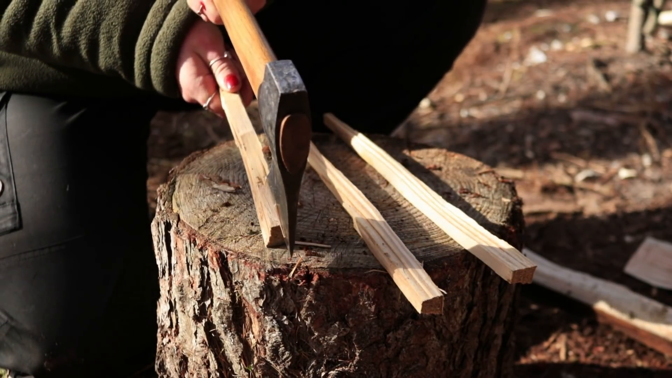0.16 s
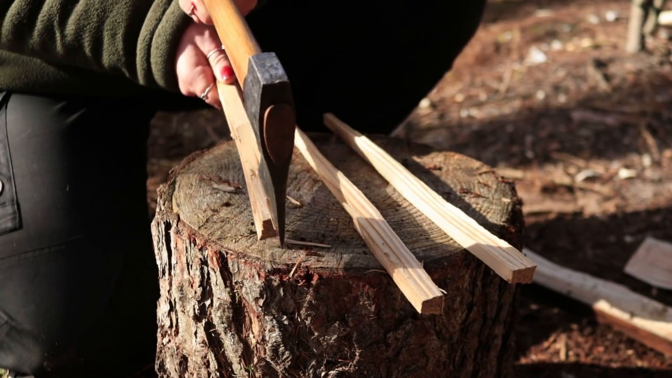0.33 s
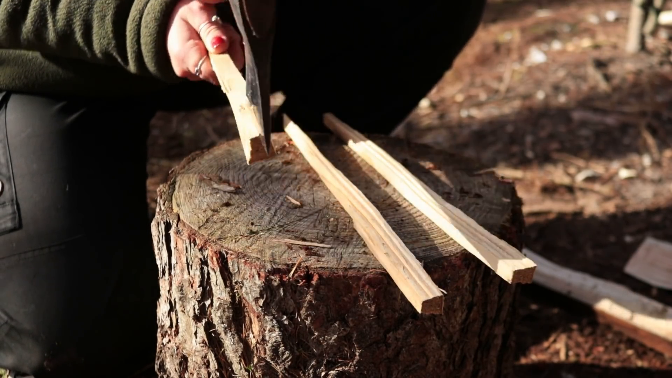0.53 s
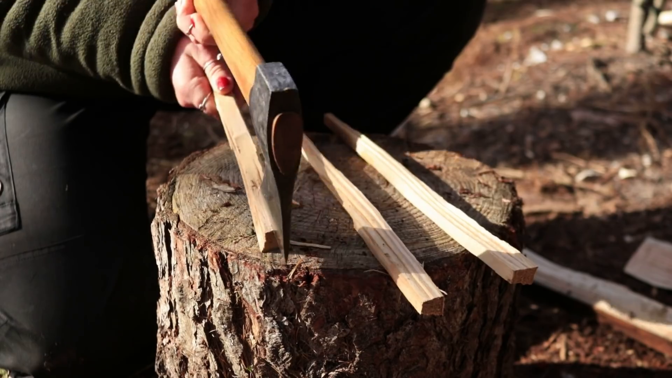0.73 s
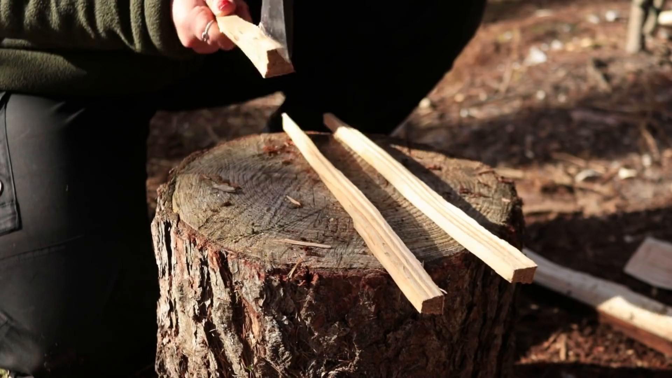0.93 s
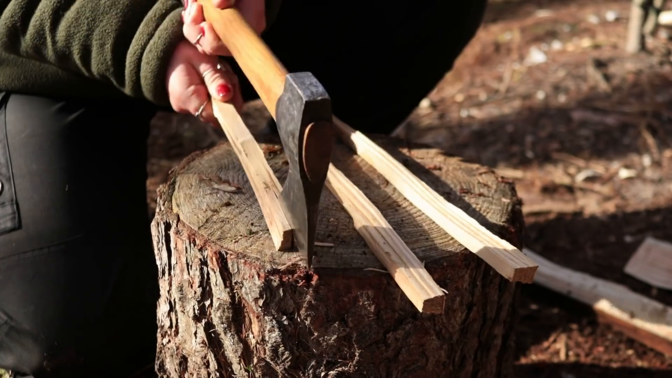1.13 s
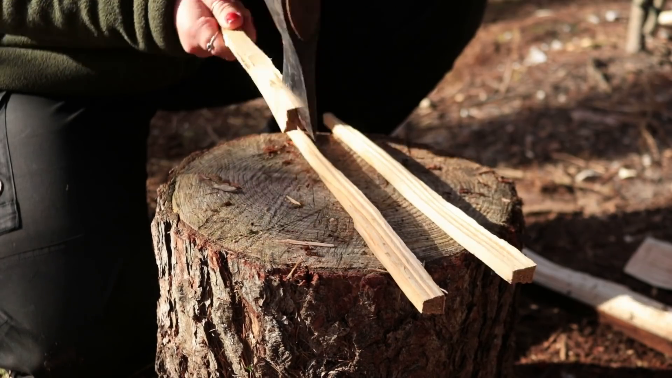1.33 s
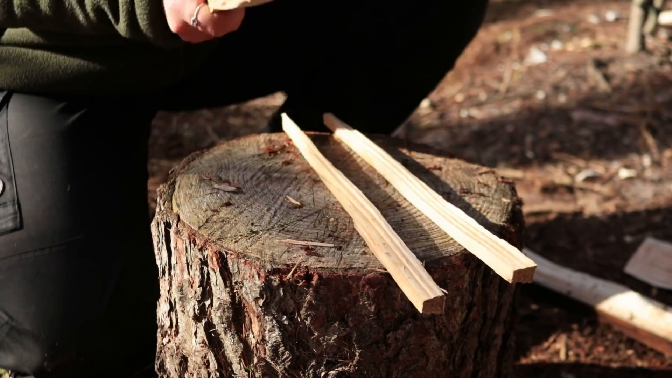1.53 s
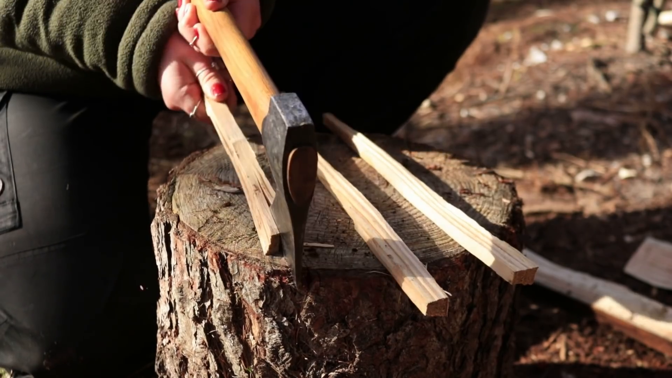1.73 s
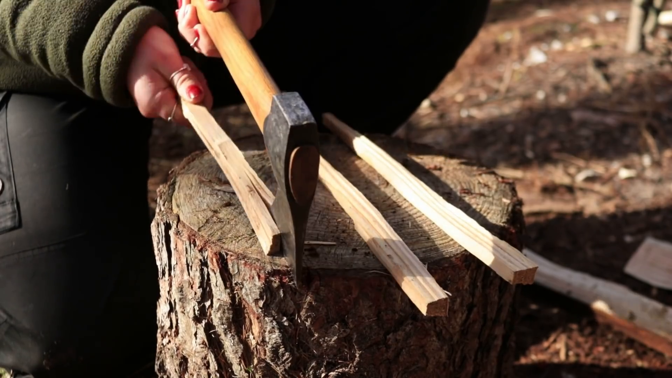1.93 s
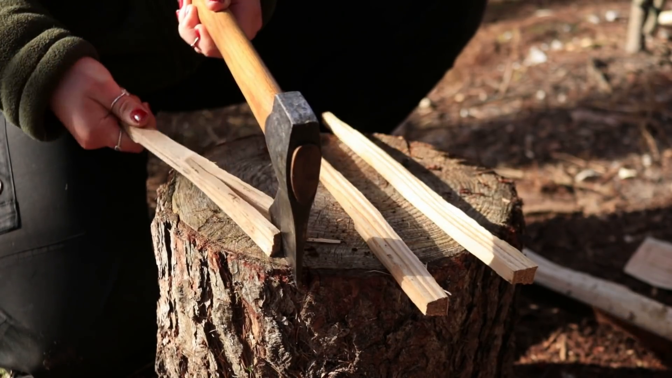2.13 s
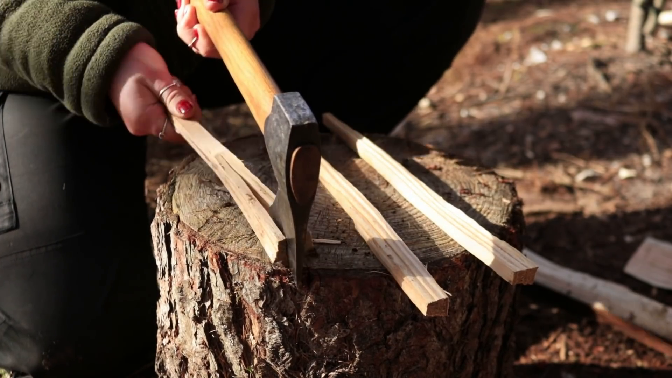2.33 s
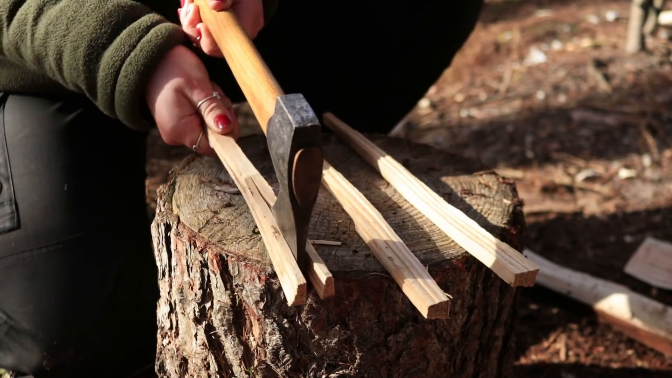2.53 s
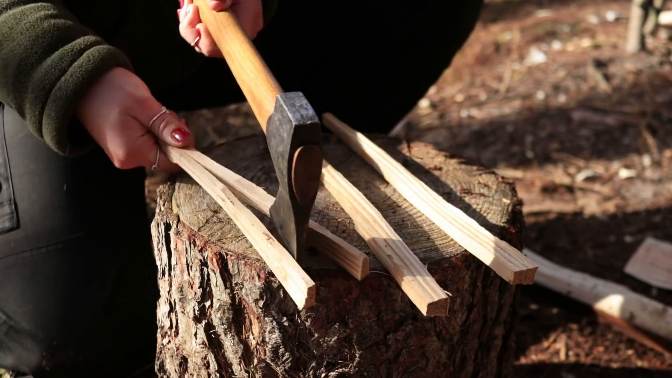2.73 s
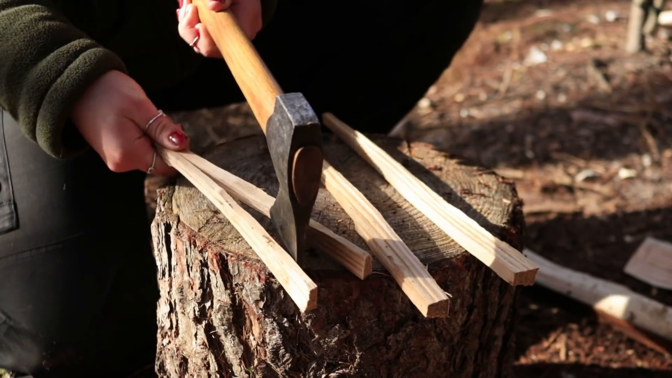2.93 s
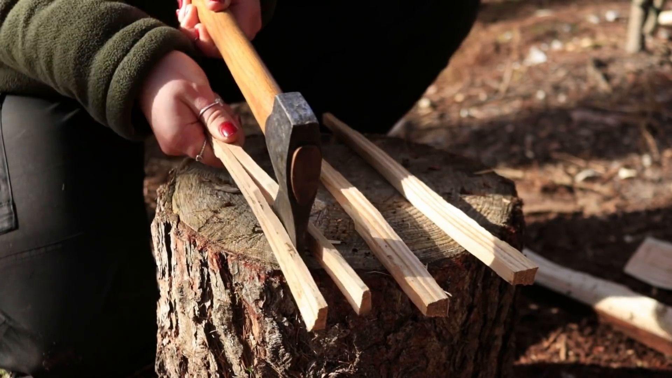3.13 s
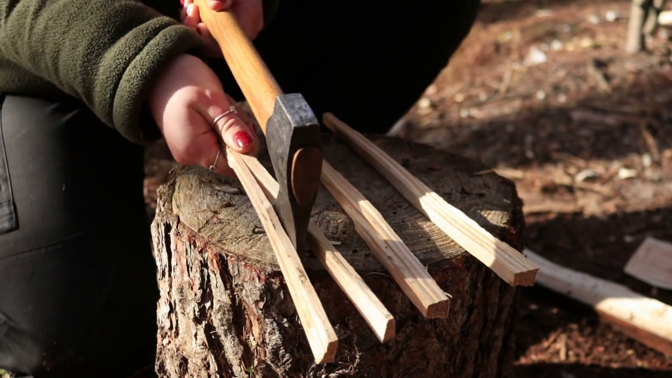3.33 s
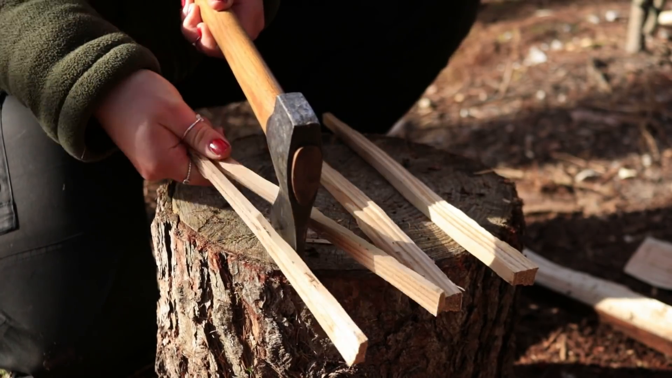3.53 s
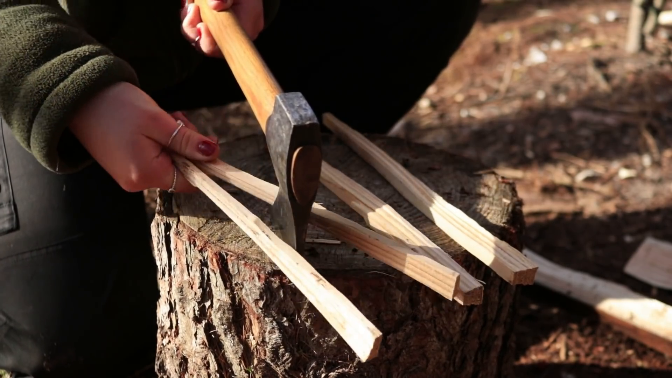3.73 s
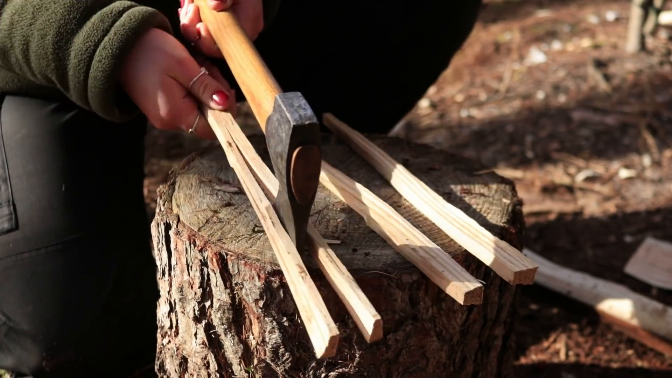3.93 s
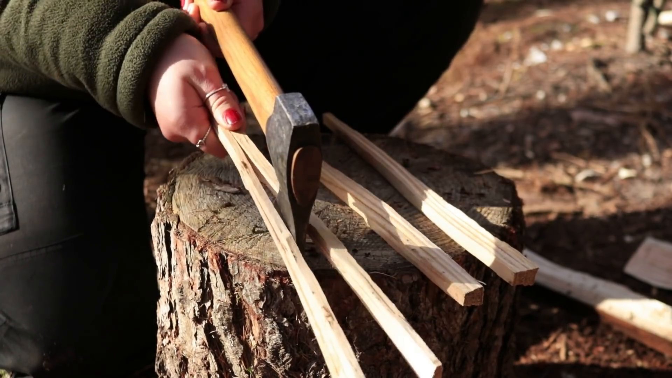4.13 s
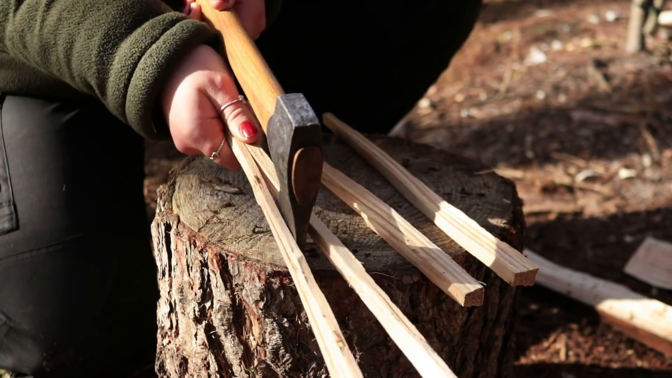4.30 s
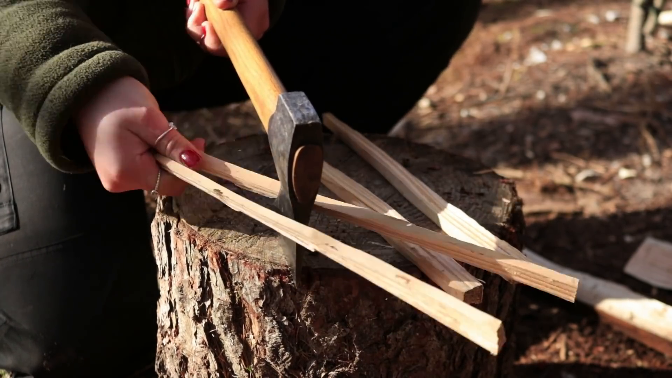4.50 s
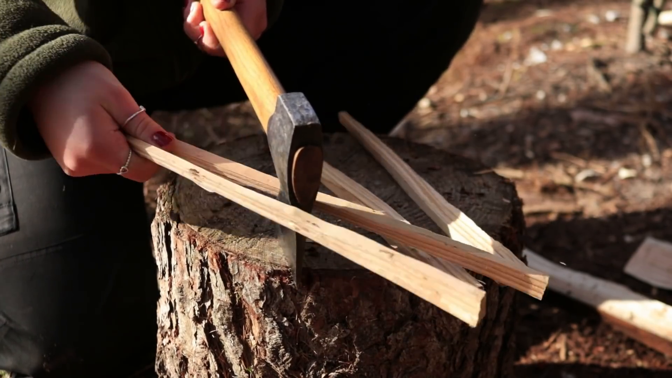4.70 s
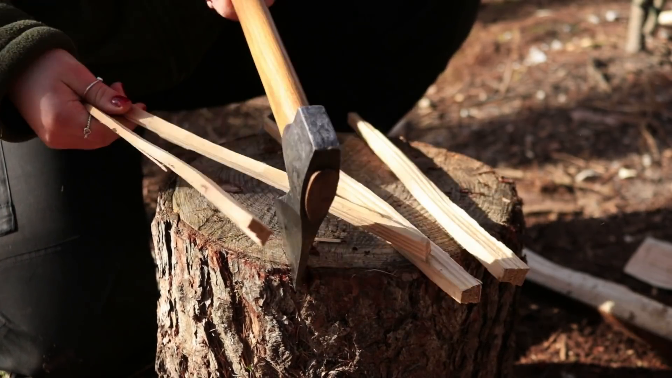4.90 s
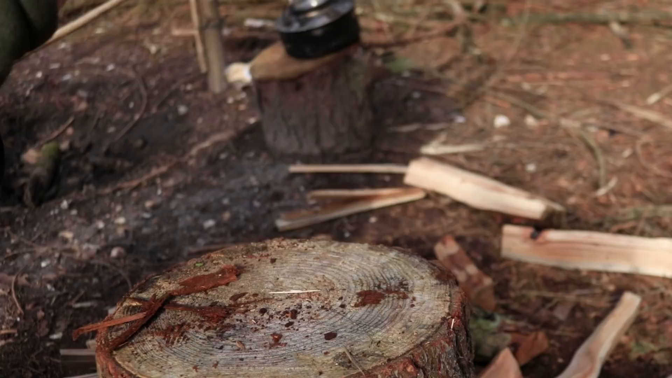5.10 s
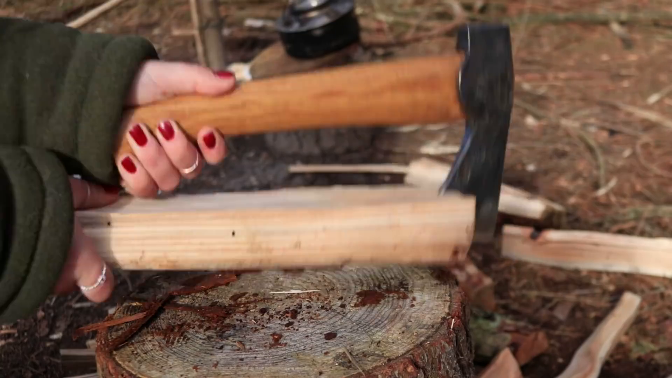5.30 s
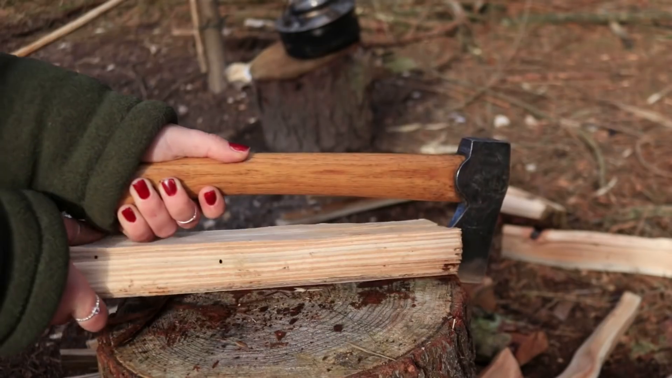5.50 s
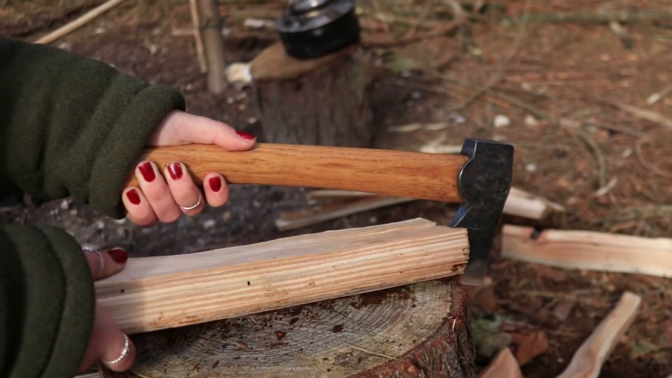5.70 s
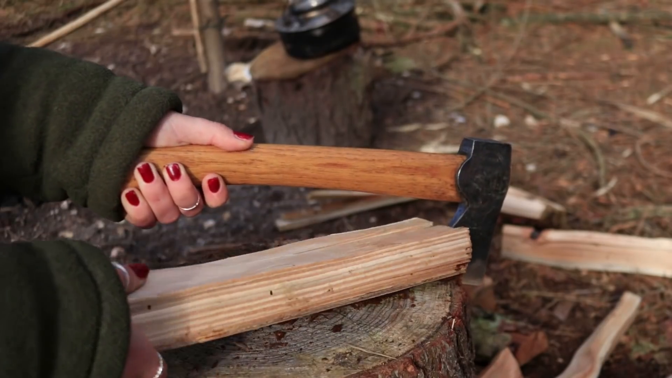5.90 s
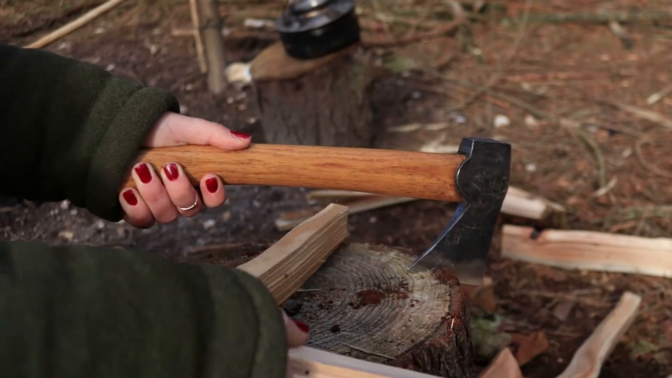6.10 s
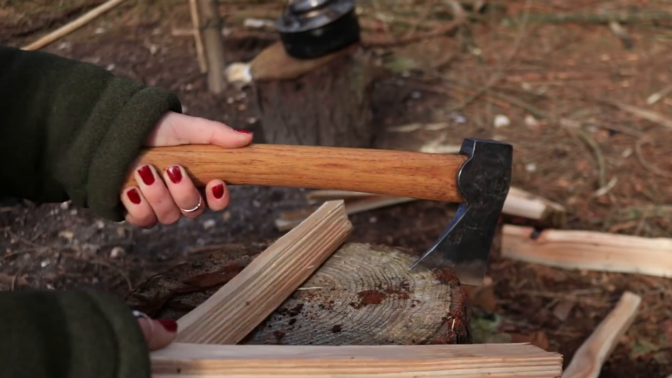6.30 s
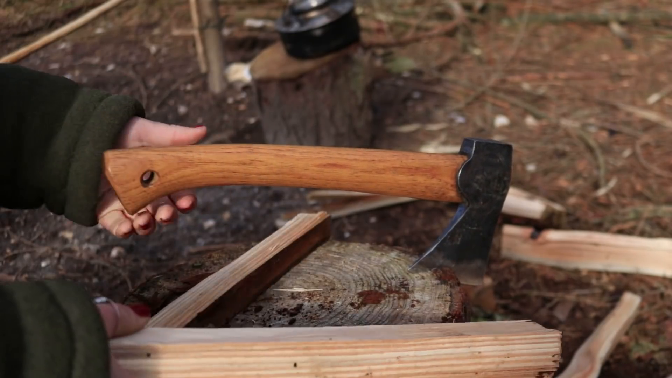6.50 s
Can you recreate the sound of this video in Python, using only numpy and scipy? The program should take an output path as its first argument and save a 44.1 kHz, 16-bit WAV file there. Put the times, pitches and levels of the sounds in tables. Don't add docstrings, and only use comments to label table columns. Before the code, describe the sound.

Close dry hatchet blows on a stump, crackling wood fibres and soft scrapes, a heavy split, sharp cracks and a ringing wooden knock outdoors.

```python
import sys
import numpy as np
from scipy import signal
from scipy.fft import rfft, irfft, next_fast_len
from scipy.io import wavfile

SR = 44100
rng = np.random.default_rng(int(sys.argv[2]) if len(sys.argv) > 2 else 0)


def decibels_to_gain(level_db):
    exponent = np.asarray(level_db, float) / 20
    return 10 ** exponent


def wrap_up_sound(samples):
    columns = np.atleast_2d(samples).T
    tamed = np.clip(columns, -1, 1)
    steps = np.round(tamed * 32767).astype(np.int16)
    wavfile.write(sys.argv[1], SR, steps)


N = 288899

# pitch_hz, density_db (per Hz)
FRICTION_TONE = [(710, -51), (1200, -4), (1680, -10.5), (2380, -24.5), (3110, 11), (3620, -0.5), (4310, -1),
                 (5130, -13), (5900, 4.5), (7660, 6), (14000, -5.5), (16000, -12)]


def splintering():
    # start_s, pitch_hz, peak_db, drive_t60_s
    broad_modes = [(.7195, 3824, -1.5, .012), (.7195, 1491, -5.5, 0.0047), (.7192, 8900, -4, 0.011),
                   (1.175, 7820, 12, 0.021), (1.176, 3880, 9.5, 0.0084), (1.178, 1332, -13, .02),
                   (1.7068, 2900, 4, .016), (1.7085, 1332, 0.5, 0.015), (1.711, 719, -11.5, .02),
                   (2.066, 1280, -34.5, 0.011), (4.554, 4130, -9.5, 0.017), (4.556, 1415, -16.5, 0.028),
                   (4.560, 820, -20, 0.04), (5.4005, 1583, 15.5, 0.0085), (5.404, 867, 7, 0.033),
                   (5.404, 567, 2.5, 0.027), (1.177, 2340, -8, 0.022), (5.9642, 2620, -13, 0.012),
                   (6.0135, 3280, 2, 0.035), (6.017, 1415, -4, 0.028), (6.1325, 1500, -23, 0.017),
                   (6.369, 2860, -36.5, 0.005), (6.467, 990, -18.5, 0.016), (6.467, 2900, -45, .012)]
    # start_s, pitch_hz, peak_db, drive_t60_s
    clear_modes = [(2.065, 3200, -21.5, .0085), (2.063, 4100, -21.5, 0.0081), (5.405, 2340, 1, 0.02),
                   (5.415, 1000, -26, 0.6), (6.017, 2040, -4, 0.04), (6.014, 540, -16, .022),
                   (.723, 810, -27.5, 0.023), (6.017, 930, -13.5, .025), (6.370, 4200, -27.5, 0.011)]
    out = np.zeros((2, N))
    for rows, width_over_pitch in ((broad_modes, 0.32), (clear_modes, 0.11)):
        for s, hz, peak_db, t60 in rows:
            width_hz = width_over_pitch * hz
            drive = burst(t60, rise_s=0.0013, spread=0.15 + hz / 14000, length=11000)
            rung = resonance(resonance(drive, hz, 5.4 * width_hz), hz, width_hz)
            add(out, s - 0.0005, decibels_to_gain(peak_db) * rung / np.abs(rung).max())
    return out


def thuds():
    # start_s, stump_db, ground_db
    blows = [
        (.723, -30.5, -30),
        (1.18, -24.5, -33.5),
        (1.7118, -8.5, -22.5),
        (5.404, -12.5, -12.5),
        (5.80, -70.5, -38),
    ]
    # pitch_hz, level_db, t60_s
    stump_modes = [(300, 8.5, 0.034), (419, -2, 0.043), (463, 7, 0.014)]
    # pitch_hz, level_db, t60_s
    ground_modes = [(56, 4, 0.085), (110, -1, 0.07)]
    out = np.zeros((2, N))
    soft = np.minimum(np.arange(12000) / (0.0022 * SR), 1)
    stump = band(ring(stump_modes, length=12000), 230, 2200)
    ground = soft * ring(ground_modes, length=12000)
    for s, stump_db, ground_db in blows:
        add(out, s, decibels_to_gain(stump_db) * stump)
        add(out[0], s + 0.0030, decibels_to_gain(ground_db + 0.3) * ground)
        add(out[1], s + 0.0022, decibels_to_gain(ground_db) * ground)
    return out


def loose_pieces():
    # pitch_hz, level_db, t60_s
    stick_modes = [(918, -8.5, .16), (990, -9, 0.13), (1740, -4, 0.12), (1970, -8, 0.14), (2770, 1.5, 0.07),
                   (3000, -16, .09)]
    # start_s, level_db
    stick_knocks = [
        (1.7225, -25.5),
    ]
    # pitch_hz, level_db, t60_s
    chip_modes = [(750, -1, .06), (1500, -4, .02), (2580, 0, .07), (3200, -12, .08)]
    # start_s, level_db
    chip_knocks = [
        (6.1322, -30),
        (6.1343, -36),
    ]
    out = np.zeros((2, N))
    for s, db in stick_knocks:
        add(out, s, decibels_to_gain(db) * ring(stick_modes, length=17000))
    for s, db in chip_knocks:
        add(out, s, decibels_to_gain(db) * ring(chip_modes, length=6000))
    return out


def snap_rows():
    # start_s, peak_db, body_db and middle_db (under the top), pan_db (left-right)
    cracks = [(.719, -10.5, -24, -3.5, -5.5), (1.175, 7, -12.5, -10.5, -4), (1.1823, -10, -22, -15, -10.5),
              (1.7079, 9.5, -22, -8.5, -13), (2.0642, -4, -26, -11, -0.5), (4.4777, -18, -30, -10.5, 1),
              (4.5442, 7, -40, -21, -9.5), (4.5524, 6, -32, -18.5, 0), (4.5590, -11, -14, -1, -2),
              (5.401, 14.5, -14, -16.5, 8), (5.964, -9.5, -20.5, -6, -12), (5.9879, -5, -40, -13, 4.5),
              (5.9954, 3, -21, -5.5, -6), (6.0118, -4, -19.5, -12.5, -0.5), (6.0146, 2, -12.5, -19.5, -1),
              (6.0195, -3, -8, 2, 0)]
    # start_s, peak_db, thickness_db
    tears = [(2.0257, -20.5, -5), (2.0794, -29, -1), (2.156, -12.5, 0), (2.173, -15, -10),
             (2.1834, -20, -7), (2.2401, -17, -15.5), (2.2448, -19, -9.5), (2.6811, -27, -2),
             (2.7128, -26, -0.5), (2.743, -16.5, -2.5), (2.7526, -13, 0), (2.7577, -10, 5.5),
             (2.7929, -4, 0), (2.7971, -11.5, 1), (2.8422, -13.5, 2), (2.8787, -21, -6), (2.925, -19, -10),
             (2.933, -18.5, 11.5), (3.5125, -10.5, -1), (3.579, -25, -4), (3.5966, -14.5, 3.5),
             (3.6015, -14, -4), (3.6384, -14.5, -10), (3.6515, -15, 2.5), (3.676, -16.5, -3.5),
             (3.7044, -22, -1), (3.719, -25.5, -1), (3.7955, -23, -9), (3.8098, -17, 4), (3.8151, -20, -2)]
    # start_s, peak_db, body_db and middle_db (under the top)
    taps = [(0.5327, -33, -1, -38), (0.674, -32, -10, -16.5), (4.507, -32, -8, -3.5),
            (5.019, -33, -7.5, -24), (5.1048, -30, -4, -36), (5.7994, -30, -11, -23.5),
            (5.9318, -26, -18.5, -16), (5.075, -38.5, -23, -24), (5.95, -26, -17.5, -7),
            (6.061, -21.5, -1, -17), (6.0673, -21, -26, -5), (6.0897, -31, -7, -2),
            (6.2772, -29.5, -7, -48), (6.3681, -19, -33, 3.5), (6.4003, -27.5, 5, -5),
            (6.4045, -29, -7, -1), (6.283, -37, -16, -25), (6.4638, -25.5, 7, -1), (6.507, -34.5, -5, -11),
            (5.978, -23, -23, 0), (3.881, -38, -25, -3), (3.933, -33, -25, -18)]
    rows = [(*row, 0.01) for row in cracks]
    for s, peak_db, thick_db in tears:
        rows.append((s, peak_db, -27.5 + 0.68 * thick_db, -18 + thick_db, -0.5, 0.007))
    return rows + [(*row, -8.5, 0.013) for row in taps]


def snaps():
    out = np.zeros((2, N))
    for s, peak_db, body_db, middle_db, pan_db, t60 in snap_rows():
        x = burst(t60, rise_s=0.0004, spread=0.65, length=3500)
        top = band(x, 5400, 11800)
        middle = decibels_to_gain(middle_db + 8.5) * band(x, 2000, 6950)
        body = decibels_to_gain(body_db + 14.5) * band(x, 880, 2220)
        snap = top + middle + body
        sides = decibels_to_gain(np.clip(pan_db, -8, 8) * np.array([[0.4], [-0.4]]))
        add(out, s - 0.0003, decibels_to_gain(peak_db - 0.5) * sides * snap / np.abs(snap).max())
    return out


def rings():
    # start_s, pitch_hz, level_db, t60_s
    struck_modes = [(4.5605, 800, -20, .06), (5.404, 460, -11, .035), (5.964, 1300, -24, .012),
                    (.7185, 1520, -16, .02), (.7195, 2100, -18, .015), (.723, 888, -29, .045),
                    (.722, 2850, -30, .04), (.722, 1800, -39, .06), (1.1755, 2500, -14, .025),
                    (1.1755, 4120, -14, .025), (1.176, 1500, -12, .02), (1.709, 1010, -12, .035),
                    (1.709, 1430, -7, .03), (1.708, 3800, -7, .025), (1.7075, 7400, -7, .015),
                    (5.403, 1090, -6, .04), (5.403, 400, -12, .03), (6.0135, 851, -12, .03),
                    (6.0255, 851, -22, .02), (2.0655, 1050, -30, .015), (6.133, 760, -27, .05),
                    (6.0135, 500, -15, .03), (6.06, 1000, -34, .03), (6.37, 2400, -34, .015),
                    (2.757, 1900, -30, .012), (2.793, 2100, -32, .012), (6.015, 2560, -12, .04),
                    (6.018, 1440, -12, .035), (5.9955, 2300, -14, .015)]
    out = np.zeros((2, N))
    sides = decibels_to_gain(np.array([[-0.8], [0.8]]))
    onset = np.minimum(np.arange(6000) / 22, 1)
    for s, hz, db, t60 in struck_modes:
        add(out, s, sides * onset * ring([(hz, db, t60)], length=6000))
    return out


def shudder():
    start_s, release_s, level_db, t60_s, release_db_per_s = 5.412, 5.59, -37, 0.9, 200
    out, t = np.zeros((2, N)), np.arange(SR // 2) / SR
    mid, side = rng.standard_normal((2, len(t)))
    rattle = band(mid + 0.35 * side * [[1], [-1]], 1450, 2300)
    rattle = band(band(rattle, 900, 2600), 900, 2600)
    released_db = release_db_per_s * np.maximum(t + start_s - release_s, 0)
    dying = decibels_to_gain(level_db - 60 * t / t60_s - released_db)
    add(out, start_s, dying * np.minimum(t / 0.016, 1) * rms_one(rattle))
    return out


def billet():
    # start_s, peak_db, free_share (of the ring time left by the hand)
    knocks = [
        (6.379, -33, 0.3),
        (6.403, -30.5, 0.3),
        (6.469, -11, 0.3),
        (6.506, -29.5, 0.3),
    ]
    # pitch_hz, level_db, t60_s
    bar_modes = [(704, 2, 0.44), (1066, -13, 0.13), (1130, -11, 0.23), (1748, -11, 0.17),
                 (2500, -11, 0.067), (2920, -10, 0.033), (4100, -27, 0.082)]
    out = np.zeros(N)
    for s, peak_db, free in knocks:
        free = 1 if s > 6.45 else np.clip(free, 0.05, 1)
        modes = [(hz, db + rng.normal(0, 1), t60 * free ** (700 / hz)) for hz, db, t60 in bar_modes]
        add(out, s - 0.002, decibels_to_gain(peak_db - 5.5) * ring(modes, length=20000))
    return out


def strokes():
    # start_s, break_s, break_db, rise_db
    swell_rows = [(2.032, 2.067, -36.5, 7), (1.17, 1.1745, -29.5, 14), (2.085, 2.181, -34.5, 7.5),
                  (2.69, 2.752, -37, 14), (2.742, 2.792, -30.5, 10.5), (3.484, 3.521, -41, 14.5),
                  (3.565, 3.592, -33.5, 13), (4.461, 4.481, -42.5, 13.5), (4.478, 4.544, -34, 14),
                  (2.784, 2.799, -25, 6), (4.546, 4.553, -24, 2), (5.235, 5.344, -52, 9.5),
                  (5.912, 5.963, -42, 9.5), (5.971, 6.0, -29, 3.5), (5.998, 6.013, -12, 14.5),
                  (0.715, 0.717, -35, 11.5), (6.054, 6.069, -35, 9.5), (6.075, 6.09, -42.5, 7.5)]
    # start_s, level_db, fall_db_per_s, brightness_db
    spray_rows = [(1.715, -41, 230, -3), (.725, -39, 396, -1.5), (1.1898, -35, 140, -1),
                  (1.18, -20, 1300, 2), (2.066, -35.5, 149.5, 0), (2.18, -37, 157.5, 3),
                  (2.799, -32, 130, 4), (2.838, -36, 220, 5), (3.515, -32.5, 281, 8), (3.593, -36, 97.5, 6),
                  (3.638, -31, 243, 3), (4.56, -34.5, 250.5, -1.5), (5.3, -45, 162, -7),
                  (5.41, -27.5, 399, -3), (5.44, -45.5, 99.5, -9.5), (6.021, -29.5, 297.5, -8)]
    # start_s, end_s, level_db, brightness_db
    rub_rows = [(2.4, 2.618, -47.5, 0), (3.095, 3.386, -51.5, 3), (3.857, 4.016, -47, 2),
                (4.104, 4.384, -50.5, -3), (4.6, 5.258, -59, -1), (5.604, 5.906, -53.5, -1.5),
                (6.296, 6.6, -61, -5.5), (2.22, 2.345, -50, 4.5), (2.923, 3.028, -47.5, -0.5),
                (3.698, 3.878, -49, 1), (6.104, 6.21, -49, -4)]
    tearing_shares = (.45, .28, .2)
    let_go_db_per_s, rub_edge_db_per_s = 3002, 426
    t = np.arange(0, N + 32, 32) / SR
    swells, sprays, rubs = [], [], []
    for start, end, db, rise_db in swell_rows:
        strain = db + rise_db * (t - end) / (end - start)
        let_go = db + let_go_db_per_s * (end - t)
        set_in = db - rise_db + let_go_db_per_s * (t - start + 0.0049)
        swells.append(np.minimum.reduce([strain, let_go, set_in]))
    for s, db, fall_db, _ in spray_rows:
        sprays.append(np.minimum(db - fall_db * (t - s), db + let_go_db_per_s * (t - s)))
    for start, end, db, _ in rub_rows:
        edge = rub_edge_db_per_s * np.minimum(t - start, end - t)
        rubs.append(np.minimum(db, db - 19.5 + edge))
    power = decibels_to_gain(np.maximum(swells + sprays + rubs, -100)) ** 2
    total = power.sum(0)
    bright_db = np.array([6] * len(swells) + [row[3] for row in spray_rows + rub_rows])
    tearing = np.repeat(tearing_shares, [len(swells), len(sprays), len(rubs)])
    tearing = tearing + 0.045 * bright_db
    return in_time(np.transpose([t, 10 * np.log10(total), tearing @ power / total, bright_db @ power / total]))


def fibres():
    sizes = decibels_to_gain(3.0 * np.minimum(rng.exponential(1, N), 4)) * rng.choice([-1, 1], N)
    breaks = rng.random(N) < 1500 * decibels_to_gain(6 * drift(35)) / SR
    clicks = sizes * breaks + 1e-18
    pitches, dealt = np.geomspace(2600, 13500, 12), rng.integers(0, 12, N)
    sides = decibels_to_gain(rng.normal(0, 3, (12, 2, 1)))
    out = 0
    for k, (hz, side) in enumerate(zip(pitches, sides)):
        gain = decibels_to_gain(0.29 * at_hz(FRICTION_TONE, hz))
        out = out + side * gain * resonance(clicks * (dealt == k), hz, 0.13 * hz)
    return rms_one(out)


def slide():
    hiss_db, tearing, bright_db = strokes()
    tearing = np.clip(tearing, 0, 1)
    sizes = decibels_to_gain(2.3 * np.minimum(rng.exponential(1, (2, N)), 5)) * rng.choice([-1, 1], (2, N))
    clicks = rms_one(sizes * (rng.random((2, N)) < 1800 * decibels_to_gain(5 * drift(40)) / SR))
    noise = rng.standard_normal((2, 2, N))
    rubbing = np.sqrt(1 - tearing) * noise
    parting = 0.64 * np.sqrt(tearing) * clicks[:, None] * [[1], [0.6]]
    hiss = coloured(rubbing + parting, FRICTION_TONE, patchy_db=2.8, rate=18)
    hiss = hiss + tearing * fibres()
    top = signal.sosfilt(signal.butter(2, 9000, "high", fs=SR, output="sos"), hiss)
    return decibels_to_gain(hiss_db + 1.8 * drift(61)) * (hiss + (decibels_to_gain(bright_db) - 1) * top)


def ticks():
    # start_s, peak_db, pitch_hz
    tick_rows = [(2.1094, -25, 8050), (2.1274, -23, 7180), (2.1364, -21, 7060), (2.1454, -18, 7220),
                 (2.1614, -16, 6750), (2.2004, -27, 6600), (2.2324, -18, 6600), (2.2524, -28, 6510),
                 (2.2794, -29, 5820), (2.7122, -25, 8340), (2.7244, -17, 7750), (2.7644, -18, 6510),
                 (2.7876, -8, 6560), (2.8194, -22, 7310), (2.8294, -13, 11800), (2.8524, -21, 11700),
                 (2.8724, -20, 10000), (2.9944, -38, 7950), (3.5274, -21, 9040), (3.5394, -25, 12200),
                 (3.5854, -19, 10500), (3.5912, -16, 7410), (3.6114, -21, 13100), (3.6444, -18, 7910),
                 (3.6594, -20, 6220), (3.6864, -25, 7140), (3.7394, -37, 7910), (3.7784, -26, 9180)]
    out = np.zeros((2, N))
    for s, peak_db, hz in tick_rows:
        x = resonance(burst(t60=0.005, rise_s=0.0002, spread=0.7, length=900), hz, 0.8 * hz)
        add(out, s, decibels_to_gain(peak_db - 5) * x / np.abs(x).max())
    return out


def squeals():
    # start_s, end_s, pitch_hz, level_db, width_hz
    squeal_rows = [(2.116, 2.319, 6640, -47.5, 700), (2.403, 2.54, 5650, -59, 300),
                   (3.139, 3.304, 3300, -54.5, 1300), (3.89, 4.019, 4300, -60, 250),
                   (6.04, 6.2, 3100, -52.5, 1180), (6.33, 6.43, 2600, -52, 900),
                   (3.896, 3.97, 3300, -56, 450), (4.715, 4.816, 2900, -55.5, 200),
                   (4.82, 4.956, 2700, -64, 150), (5.696, 5.987, 4400, -68, 260),
                   (3.64, 3.8, 11600, -52, 600), (2.72, 2.9, 11000, -43, 2500),
                   (2.09, 2.17, 11000, -46, 1500), (3.57, 3.68, 7800, -43, 1800)]
    out = np.zeros((2, N))
    for start, end, hz, db, width_hz in squeal_rows:
        length = round((end - start) * SR)
        noise = rng.standard_normal((2, length))
        narrow = resonance(resonance(noise, hz, width_hz), hz, width_hz)
        squeal = rms_one(narrow + narrow[::-1] * 0.5)
        add(out, start, decibels_to_gain(db) * squeal * signal.windows.tukey(length, 0.8))
    return out


def glide():
    # start_s, end_s, from_hz, to_hz, level_db, width_hz
    falling_tone = (2.07, 2.21, 9000, 6700, -44, 900)
    start, end, from_hz, to_hz, db, width_hz = falling_tone
    out, length = np.zeros((2, N)), round((end - start) * SR)
    lowpass = signal.butter(2, width_hz / 2, fs=SR, output="sos")
    slow = signal.sosfilt(lowpass, rng.standard_normal((2, 2, 9000)))[..., :length]
    phase = 2 * np.pi * np.cumsum(np.geomspace(from_hz, to_hz, length)) / SR
    tone = rms_one(slow[0] * np.cos(phase) + slow[1] * np.sin(phase))
    add(out, start, decibels_to_gain(db) * tone * signal.windows.tukey(length, 0.6))
    return out


def trunks(x):
    t60_s, level_db = 0.6, -56.5
    t = np.arange(SR // 2) / SR
    scatter = rng.standard_normal((2, len(t))) * decibels_to_gain(-60 * t / t60_s) * np.minimum(t / 0.01, 1)
    return decibels_to_gain(level_db) * signal.fftconvolve(band(scatter, 750, 2300), x[None])[:, :N]


def background():
    # time_s, level_db
    traffic_level = [(0.0, -46), (0.2, -50.5), (0.51, -49.5), (0.97, -54.5), (1.09, -50), (3.15, -48),
                     (3.32, -43.5), (3.5, -48.5), (4.71, -43.5), (5.09, -50), (6.11, -52), (6.55, -52.5)]
    # pitch_hz, density_db (per Hz)
    rumble_tone = [(20, -11), (45, 3), (70, 5), (110, 2.5), (170, -59.5), (400, -60.5)]
    # pitch_hz, density_db (per Hz)
    air_tone = [(59, -49), (100, -1), (255, -6), (381, -4), (558, -8.5), (1280, -11), (2080, -20),
                (3940, -26), (4670, -31.5), (9610, -26.5), (15000, -36), (16000, -38)]
    rumble_db, = in_time(traffic_level)
    noise = rng.standard_normal((2, 2, N))
    rumble = decibels_to_gain(rumble_db + 1.5) * coloured(noise, rumble_tone, patchy_db=1.5, rate=7.3)
    air = decibels_to_gain(-44.5) * coloured(noise[::-1], air_tone, patchy_db=2.0, rate=4.4)
    return rumble + air


def rms_one(x):
    return x / np.sqrt(np.mean(x ** 2) + 1e-20)


def in_time(rows):
    s, *columns = np.transpose(rows)
    return [np.interp(np.arange(N) / SR, s, c) for c in columns]


def at_hz(points, hz):
    return np.interp(np.log(hz), np.log(np.array(points)[:, 0]), np.array(points)[:, 1])


def band(x, low_hz, high_hz):
    return signal.sosfilt(signal.butter(2, [low_hz, min(high_hz, 0.45 * SR)], "band", fs=SR, output="sos"), x)


def resonance(x, hz, width_hz):
    r = np.exp(-np.pi * width_hz / SR)
    zeros = (1 - r * r) / 2 * np.array([1, 0, -1])
    return signal.lfilter(zeros, [1, -2 * r * np.cos(2 * np.pi * hz / SR), r * r], x)


def drift(rate):
    r = np.exp(-80 * np.pi * rate / SR)
    slow = signal.lfilter([1], [1, -2 * r, r * r], rng.standard_normal(N // 40 + 2002))[2000:]
    return np.interp(np.arange(N) / 40, np.arange(len(slow)), rms_one(slow - slow.mean()))


def ring(modes, length):
    t = np.arange(length) / SR
    return sum(decibels_to_gain(db - 60 * t / t60) * np.sin(2 * np.pi * hz * t) for hz, db, t60 in modes)


def burst(t60, rise_s, spread, length):
    t = np.arange(length) / SR
    mid, side = rng.standard_normal((2, length))
    dying = decibels_to_gain(-60 * t / max(t60, 0.003)) + decibels_to_gain(-42 - 60 * t / 0.12)
    return (mid + spread * side * [[1], [-1]]) * dying * np.minimum(t / rise_s, 1)


def coloured(pair, spectrum, patchy_db, rate):
    # pitch_hz, likeness (-1 to 1)
    port_likeness = [(60, 0.93), (180, 0.9), (550, 0.66), (1650, -0.25), (4970, 0.3), (15000, -0.37)]
    out, edges = 0, 22 * 2 ** np.arange(0, 9.7, 0.4)
    for k, (low, high) in enumerate(zip(edges, edges[1:])):
        hz = np.sqrt(low * high)
        if not spectrum[0][0] < hz < spectrum[-1][0]:
            continue
        mid, side = band(pair[k % 2], low, high)
        alike = np.clip(at_hz(port_likeness, hz), 0, 1)
        gain = decibels_to_gain(at_hz(spectrum, hz) + patchy_db * drift(rate))
        out = out + gain * (np.sqrt(1 + alike) * mid + np.sqrt(1 - alike) * side * [[1], [-1]])
    return rms_one(out)


def add(out, s, x):
    i = round(s * SR)
    out[..., i:i + x.shape[-1]] += x[..., :N - i]


def scene():
    blows = splintering() + thuds() + loose_pieces() + snaps()
    ringing = rings() + shudder() + billet()
    friction = slide() + ticks() + squeals() + glide()
    return blows + ringing + friction + trunks(blows.mean(0)) + background()


def roll_off(x):
    return signal.sosfilt(signal.butter(12, 15950, fs=SR, output="sos"), x)


def record(dry):
    lag_s = 1e-5
    size = next_fast_len(N)
    turn = np.exp(-2j * np.pi * np.fft.rfftfreq(size, 1 / SR) * lag_s)
    late = irfft(rfft(dry[0], size) * turn, size)[:N]
    clipped = np.clip([late, dry[1]], -0.98, 0.98)
    coupled = signal.sosfilt(signal.butter(2, 22, "high", fs=SR, output="sos"), clipped)
    return roll_off(coupled)


dry = scene()
out = record(dry)
wrap_up_sound(out)
```